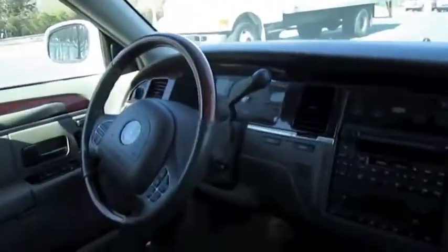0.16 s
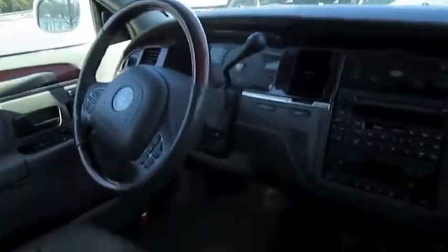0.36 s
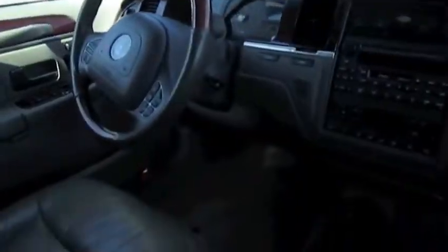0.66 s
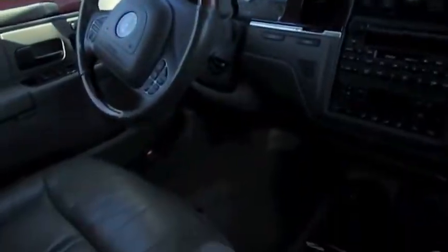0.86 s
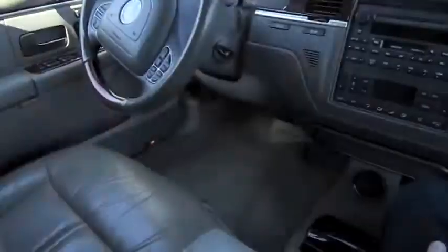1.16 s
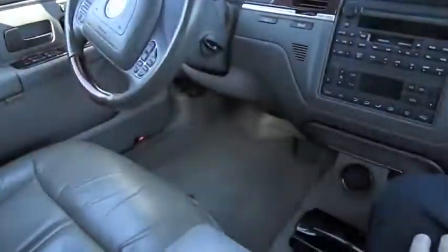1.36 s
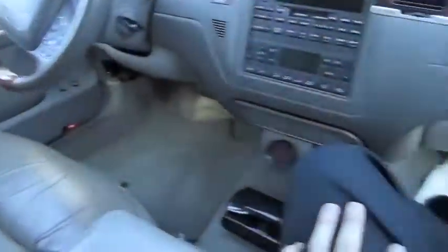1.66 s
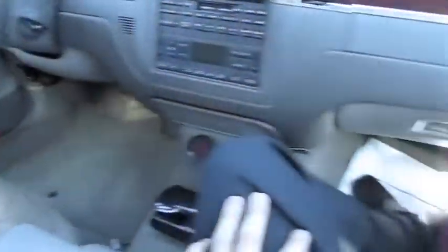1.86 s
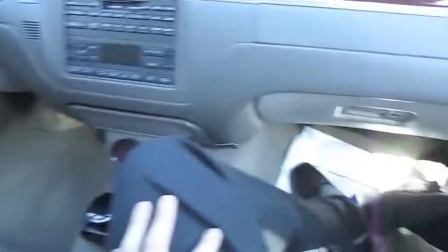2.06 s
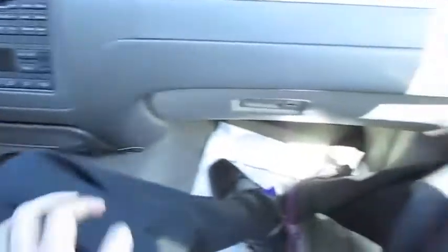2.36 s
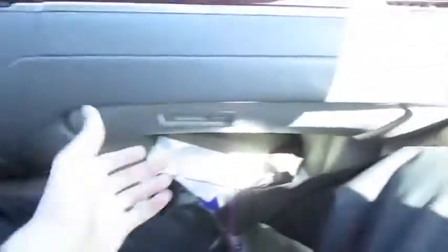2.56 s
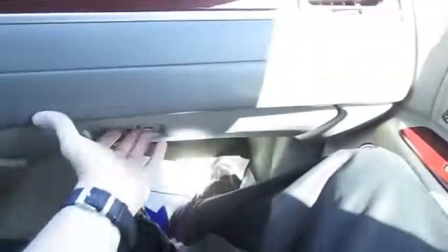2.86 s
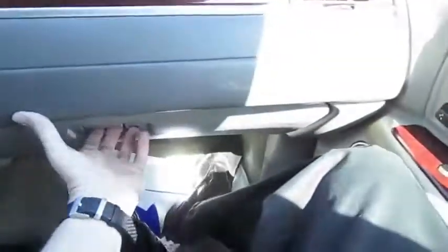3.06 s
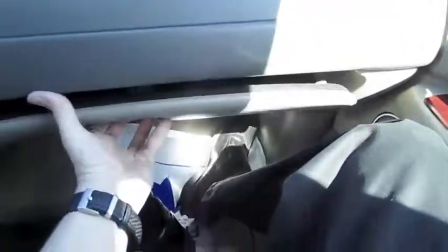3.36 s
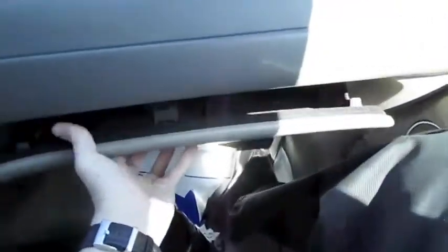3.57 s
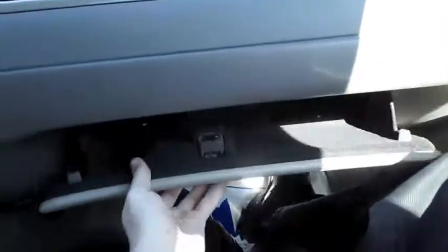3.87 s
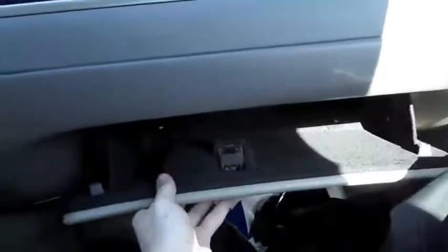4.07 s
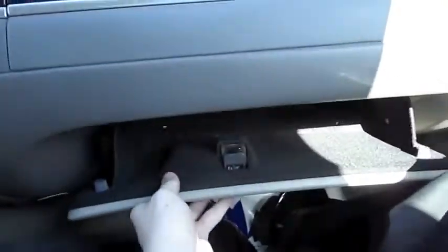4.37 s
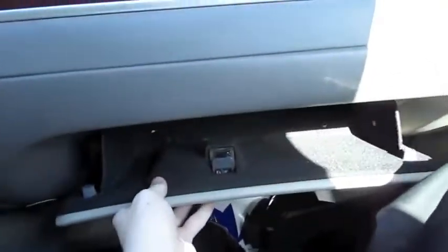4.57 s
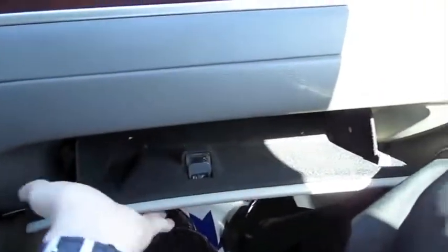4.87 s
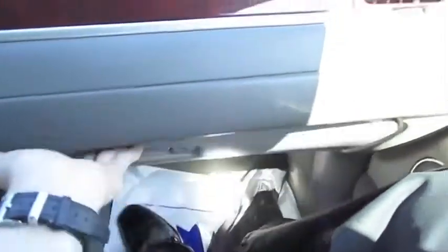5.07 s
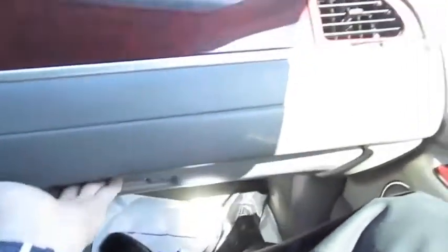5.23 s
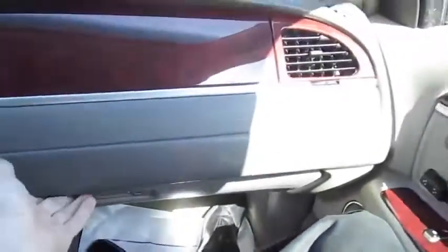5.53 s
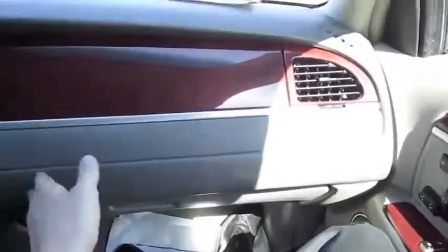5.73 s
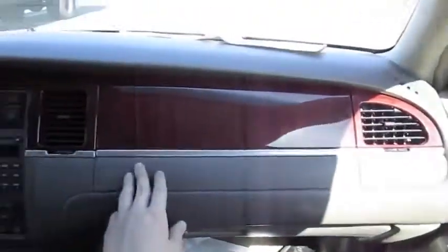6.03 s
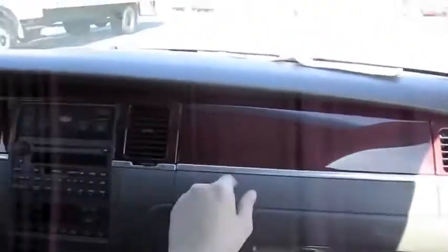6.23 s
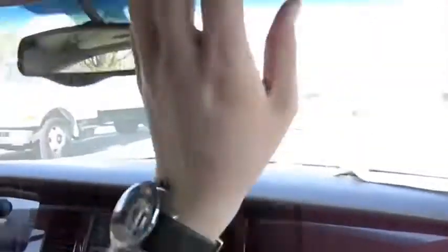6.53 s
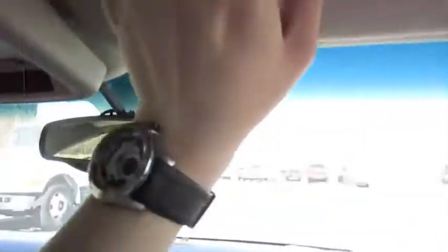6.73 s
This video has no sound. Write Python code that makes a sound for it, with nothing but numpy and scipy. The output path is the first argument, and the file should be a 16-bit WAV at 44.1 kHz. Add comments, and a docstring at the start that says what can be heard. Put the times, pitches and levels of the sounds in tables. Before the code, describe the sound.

Low engine drone in a car cabin; two clicks, sleeve rustling, scraping handle and sharp latch snap, faint ticks, then a booming glove box slam.

```python
"""An engine, most likely, idles low and steady in a parked car: wavering harmonics over coloured noise.
Two small button clicks, then cloth rustles (coloured friction noise) as a hand reaches for the glove box.
The handle scrapes (slips through resonators) and squeaks, the latch snaps, the lid opens and is slammed shut.
Blows are decaying modes plus scattered noise; trim ticks, the body booms, gain control ducks loud moments."""
import sys
import numpy as np
from scipy import signal
from scipy.fft import rfft, irfft
from scipy.io import wavfile
from scipy.ndimage import uniform_filter1d

SR = 44100
rng = np.random.default_rng(int(sys.argv[2]) if len(sys.argv) > 2 else 0)


def master_out(mix):
    """Clip the mix to full scale and print it as 16-bit PCM to the path in sys.argv[1]."""
    frames = np.transpose(np.atleast_2d(mix))
    ceiling = np.clip(frames, -1, 1)
    pcm = np.round(ceiling * 32767).astype(np.int16)
    wavfile.write(sys.argv[1], SR, pcm)


N = 304290
T = np.arange(N) / SR  # s

# idle: firing rate at the start, and its steady fall
IDLE_HZ, SAG_HZ_PER_S = 72.78, 0.385
# boom of the firing tone at the microphone: time_s, level_db
FIRING_LEVEL = [(0, -26), (.2, -25), (.78, -26.8), (1.1, -30), (1.4, -28), (2.25, -28.7), (2.52, -26),
                (3.0, -29.5), (5.0, -27.5), (5.6, -31.5), (6.2, -26), (6.6, -31.5)]
# octave of the firing tone: time_s, level_db
OCTAVE_LEVEL = [(0, -40.5), (.55, -40.5), (1.2, -46), (1.4, -51), (4.4, -48.5), (5.5, -42.5), (6.3, -49.5),
                (6.8, -45.5)]
THIRD_RE_OCTAVE_DB = -14.5
# weaker engine orders: multiple_of_firing_rate, level_re_firing_db
ENGINE_ORDERS = [(0.502, -41.5), (1.5, -31), (2.375, -35.5), (4.498, -39.5), (4.75, -37)]
# cabin noise colour: freq_hz, relative_density_db
CABIN_COLOUR = [(15, -9), (35, 7.5), (55, 1), (110, -2), (190, -11), (270, -14), (340, -17.5), (480, -20),
                (780, -19.5), (1200, -24.5), (2500, -30), (7800, -39.5), (16000, -47.5)]

# body shifts and arm moves: start_s, end_s, rustle_db, seat_db
BODY_MOVES = [(1.238, 2.46, -61.5, -52), (1.463, 2.527, -55, -81), (2.562, 3.29, -48.5, -52.5),
              (3.22, 4.15, -55.5, -62), (4.3, 4.53, -57.5, -50.5), (4.975, 5.2, -47.5, -56.5),
              (5.72, 6.0, -56, -64), (6.004, 6.4, -60, -75), (6.419, 6.85, -53, -50)]
MOVE_ATTACK_S, MOVE_RELEASE_S = 0.21, 0.19
# cloth swishes, growing until the end: start_s, end_s, level_db
CLOTH_SWISHES = [(2.188, 2.515, -52), (2.953, 3.21, -50), (3.5, 4.143, -63.5), (4.994, 5.08, -62.5),
                 (6.654, 6.852, -52)]
SWISH_RELEASE_S = 0.061
# fizz that follows the rustle; seat and fizz left while sitting still
FIZZ_RE_RUSTLE_DB, STILL_SEAT_DB, STILL_FIZZ_DB = -12.5, -59, -69.5
# seat rumble colour: freq_hz, relative_density_db
SEAT_COLOUR = [(60, -25), (110, 9), (210, 4.5), (270, 1.5), (340, 3.5), (400, -2), (490, 1.5), (700, -18.5),
               (1500, -57)]
# cloth rustle colour: freq_hz, relative_density_db
RUSTLE_COLOUR = [(250, -1), (600, 0), (900, 1.5), (2200, -4.5), (3200, -6.5), (6000, -16.5), (15000, -62)]
# fine cloth fizz colour: freq_hz, relative_density_db
FIZZ_COLOUR = [(1500, -56), (3500, -3), (5000, -1.5), (6800, -1), (10000, -5.5), (14000, -13), (16000, -29)]

# button clicks: time_s, level_db, brightness_db_per_octave
BUTTON_CLICKS = [(.5813, -21, 3.5), (.8262, -29, 9)]
# small plastic button by the microphone: freq_hz, relative_level_db, t60_s
BUTTON_MODES = [(1550, -10.5, 0.013), (2970, 1, 0.0044), (4950, -0.5, 0.0029), (8200, -13, 0.0018)]
# cabin scatter of any blow: freq_hz, relative_density_db, t60_s
CABIN_SCATTER = [(40, 5.5, 0.76), (171, 11, 0.26), (487, -7.5, 0.21), (1400, -7, 0.2), (2700, -10.5, 0.069),
                 (6080, -16, 0.1), (9400, -22.5, .08), (16000, -37.5, .07)]

# rubs on the handle, growing until the fingers let up: start_s, end_s, level_db, treble_share (0-1)
HANDLE_PULLS = [(2.937, 3.076, -36, 0.17), (3.061, 3.14, -32.5, 0.56), (3.19, 3.206, -33, 0.3)]
PULL_RELEASE_S = 0.054
# handle resonances: freq_hz, width_hz, peak_db
HANDLE_RESONANCES = [(880, 550, -2), (1300, 130, -2.5), (1500, 160, 2.5), (2070, 270, 4), (2160, 110, -8.5),
                     (2570, 280, -1.5), (3100, 130, -2.5), (3480, 36, 8), (3870, 90, -7), (5740, 170, -5.5),
                     (5500, 96, -2), (7860, 840, -16.5)]
# fingers squeak on the handle: time_s, pitch_hz, level_db
FINGER_SQUEAK = [(2.97, 697.5, -72), (3.01, 748, -50), (3.06, 801, -44), (3.085, 868, -41),
                 (3.11, 902, -70)]

# latch strains, snaps, lets go: time_s, level_db, brightness_db_per_octave, bass_db
LATCH_SNAPS = [(3.195, -45.5, 9, 0), (3.211, -35, 0.5, -0.5), (3.217, -32.5, 2, 0), (3.252, -26.5, -3, -4),
               (3.261, -28, -0.5, -5), (3.2835, -8.5, 1, -17), (3.286, -30, 2, -4), (3.3115, -23, -1.5, -9),
               (3.429, -25.5, -.5, -9)]
# latch modes: freq_hz, relative_level_db, t60_s
LATCH_MODES = [(139, -18.5, .07), (216, -15.5, 0.053), (544, -20, 0.08), (1486, 3.5, 0.012),
               (1907, -3.5, 0.032), (3340, -12, 0.011), (4100, -6.5, 0.014), (4660, -7.5, 0.019),
               (5240, -10.5, 0.02), (7670, -18, 0.018), (8510, -12.5, 0.0078), (12070, -21, .018)]
# box blows at the latch release, slam, rebounds: time_s, level_db, brightness_db_per_octave, bass_db
BOX_KNOCKS = [(3.283, -33, -4, 0), (5.1385, -14, 0, 0), (5.1513, -15, -.3, -3), (5.1565, -21, 1, -10),
              (5.198, -42, 0, -12), (5.2675, -37, -.5, -17)]
# glove box and dashboard modes: freq_hz, relative_level_db, t60_s
BOX_MODES = [(54, 1, .16), (94, 3, .08), (133, 3, .13), (156, 5, .13), (200, 6, .1), (238, 6, .09),
             (325, -4, .07), (453, -6, .13), (499, -4, .15), (566, -7, .15), (700, -3, .14), (852, -7, .08),
             (986, -6, .1), (1215, -7, .08), (1335, -11, .07), (1452, -10, .07), (1861, -10, .07),
             (2030, -13, .06), (2213, -12, .06), (2385, -14, .06), (3289, -14, .06), (4667, -15, .05),
             (5696, -14, .04)]
# light knocks of hand and lid: time_s, level_db, brightness_db_per_octave, bass_db
LID_TAPS = [(3.289, -41.5, 2, -9), (3.302, -33.5, 4.5, 7), (3.429, -27, 0.5, -1), (3.776, -45.5, 3.5, 8),
            (4.130, -29.5, -8, -18.5), (4.207, -48.5, -5, -1), (4.931, -47.5, -7, -9),
            (5.965, -41.5, 1.5, -2.5), (6.212, -33, 0, -37), (6.545, -50, -10, -18)]
# loose lid modes: freq_hz, relative_level_db, t60_s
LID_MODES = [(228, 1, 0.067), (360, -6.5, 0.096), (492, 7, 0.058), (578, -9.5, 0.3), (778, 8.5, 0.019),
             (830, 2.5, 0.042), (1020, -6, 0.038), (1390, -2.5, 0.033), (2110, -10, 0.13),
             (2760, -6.5, 0.026), (4400, -35.5, 0.027)]

# faint creaks of hinge and trim: start_s, end_s, ticks_per_s, level_db, brightness_db_per_octave
TRIM_CREAKS = [(3.55, 4.2, 11.6, -52.5, 8), (4.502, 4.6, 25.4, -49.5, 4), (5.897, 6.5, 22, -46, 0.5)]
TICK_SPREAD_DB = 2  # either way
# clearer ticks of hinge and trim: time_s, level_db, brightness_db_per_octave
TRIM_TICKS = [(3.671, -39, 4.5), (3.776, -48, 0), (3.926, -36.5, 3), (4.469, -46.5, 3.5),
              (6.078, -38.5, -2), (6.104, -35.5, -0.5), (6.130, -42, 1), (6.213, -32, -1),
              (6.369, -42.5, -1), (6.5225, -35, -0.5)]
# trim modes: freq_hz, relative_level_db, t60_s
TRIM_MODES = [(1520, -2, 0.0088), (2330, -3, 0.01), (3600, -6, 0.0097), (5800, -14, .01)]
# car body shaken by the slam: time_s, pitch_hz, level_db before rise and decay, t60_s
BODY_SHAKE = (5.15, 34, -18, 1.4)

# brief dip of the level: start_s, end_s, gain_db
LEVEL_DIP = (1.241, 1.302, -33)
BAND_EDGE_HZ = 15950


def amp(db):
    """Decibels to gain."""
    return 10 ** (np.asarray(db) / 20)


def unit(x):
    """Scales to rms 1."""
    return x / np.sqrt(np.mean(x ** 2) + 1e-20)


def curves(rows):
    """Interpolates each column of a time table at every sample."""
    s, *columns = np.transpose(rows)
    return [np.interp(T, s, c) for c in columns]


def colour(rows, hz):
    """Interpolates each column of a frequency table on a log axis."""
    f, *columns = np.transpose(rows)
    return [np.interp(np.log(hz + 1), np.log(f + 1), c) for c in columns]


def shaped(x, spectrum):
    """Filters x to a colour, at rms 1."""
    db, = colour(spectrum, np.fft.rfftfreq(N, 1 / SR))
    return unit(irfft(rfft(x) * amp(db), N))


def wander(rate_hz):
    """Low-passed noise of rms 1: a random drift."""
    hz = np.fft.rfftfreq(N, 1 / SR)
    return unit(irfft(rfft(rng.standard_normal(N)) * np.exp(-(hz / rate_hz) ** 2), N))


def swell(start_s, end_s, attack_s, release_s):
    """Movement envelope: rises from the start, holds, falls after the end."""
    rise = np.clip((T - start_s) / attack_s, 0, 1)
    fall = np.clip(1 - (T - end_s) / release_s, 0, 1)
    return rise * fall


def friction(slips_per_s, spread_db, smooth):
    """Surfaces in contact: tiny slips of uneven size over a smooth rub."""
    size = amp(spread_db * np.minimum(rng.exponential(1, N), 4))
    slipping = rng.random(N) < slips_per_s / SR
    slips = size * rng.standard_normal(N) * slipping
    return unit(slips) + smooth * rng.standard_normal(N)


def engine(waver_db=0.52, overtone_waver_db=1.96, order_waver_db=4.5):
    """Firing tone booms in the cabin with two overtones; weaker orders come and go around it."""
    firing_hz = IDLE_HZ - SAG_HZ_PER_S * T
    tone_db, = curves(FIRING_LEVEL)
    octave_db, = curves(OCTAVE_LEVEL)
    phase = 2 * np.pi * np.cumsum(firing_hz * (1 + 0.0031 * wander(9.2))) / SR
    overtones = np.sin(2 * phase) + amp(THIRD_RE_OCTAVE_DB) * np.sin(3 * phase)
    hum = amp(tone_db + waver_db * wander(32)) * np.sin(phase)
    hum += amp(octave_db + overtone_waver_db * wander(5.0)) * overtones
    for multiple, db in ENGINE_ORDERS:
        gain = amp(tone_db + db + order_waver_db * wander(4.8))
        hum += gain * np.sin(multiple * phase + 2 * np.pi * rng.random())
    return np.sqrt(2) * hum  # sine levels are rms


def cabin(level_db=-45):
    """Steady coloured noise: low rumble with a faint hiss on top."""
    return amp(level_db) * shaped(rng.standard_normal(N), CABIN_COLOUR)


def motion():
    """Gains of seat rumble, cloth rustle and fine fizz, from the moves and swishes."""
    seat, rustle, swish = np.zeros((3, N))
    for start_s, end_s, rustle_db, seat_db in BODY_MOVES:
        speed = swell(start_s, end_s, MOVE_ATTACK_S, MOVE_RELEASE_S)
        seat += amp(seat_db) * speed
        rustle += amp(rustle_db) * speed
    for start_s, end_s, db in CLOTH_SWISHES:
        swish += amp(db) * swell(start_s, end_s, end_s - start_s, SWISH_RELEASE_S)
    fizz = np.hypot(amp(FIZZ_RE_RUSTLE_DB) * rustle, swish)
    return np.hypot(seat, amp(STILL_SEAT_DB)), rustle, np.hypot(fizz, amp(STILL_FIZZ_DB))


def glancing(x, echo=0.45, delay_s=0.0016, sway=0.299):
    """The moving hand is heard directly and off the dashboard: a drifting delay shifts the colour."""
    late_s = delay_s * np.exp(sway * wander(2.9))
    return unit(x + echo * np.interp(T - late_s, T, x))


def clothes():
    """Body shifts on the seat; sleeve rustle and fizz share one uneven pressure."""
    seat_gain, rustle_gain, fizz_gain = motion()
    pressure = wander(21)
    seat = shaped(rng.standard_normal(N), SEAT_COLOUR)
    rustle = shaped(glancing(friction(1500, 2.3, 1.7)), RUSTLE_COLOUR)
    fizz = shaped(glancing(friction(3000, 7.1, 2.3)), FIZZ_COLOUR)
    return (seat_gain * amp(1.9 * wander(4.9)) * seat
            + rustle_gain * amp(1.3 * pressure) * rustle
            + fizz_gain * amp(0.63 * pressure) * fizz)


def blow(modes, scatter_db, crack_db, crack_t60_s, rise_s):
    """One blow: decaying modes, plus cabin-coloured noise with a short crack and a scattered tail."""
    t = T[:SR // 2]
    ring = np.zeros(len(t))
    for k, (hz, db, t60_s) in enumerate(modes):
        ring += (-1) ** k * amp(db - 60 * t / t60_s) * np.sin(2 * np.pi * hz * t)
    hz, age_s, z = signal.stft(rng.standard_normal(len(t)), SR, nperseg=256)
    db, t60_s = colour(CABIN_SCATTER, hz[:, None])
    tail = amp(scatter_db - 60 * age_s / t60_s)
    crack = amp(crack_db - 60 * age_s / crack_t60_s)
    noise = signal.istft(z * amp(db) * (tail + crack), SR, nperseg=256)[1][:len(t)]
    return (ring + noise) * (1 - np.exp(-t / rise_s))


def contact(x, knee_hz, tilt_db, bass_db=0):
    """Harder contact is brighter, lighter contact moves less bass below the knee."""
    hz = abs(np.fft.fftfreq(len(x), 1 / SR))
    db = tilt_db * np.log2((hz + 300) / 1500) + bass_db / (1 + (hz / knee_hz) ** 8)
    response = np.exp(np.conj(signal.hilbert(np.log(amp(db)))))  # minimum phase: causal
    return np.fft.ifft(np.fft.fft(x) * response).real


def add(mix, start_s, sound):
    """Adds a sound into the mix in place."""
    part = mix[round(start_s * SR):][:len(sound)]
    part += sound[:len(part)]


def strikes(rows, modes, scatter_db, crack_db, crack_t60_s, rise_s, knee_hz=300):
    """Plays a table of blows on one part, each with fresh scatter."""
    out = np.zeros(N)
    for start_s, db, *touch in rows:
        hit = blow(modes, scatter_db, crack_db, crack_t60_s, rise_s)
        add(out, start_s, amp(db) * contact(hit, knee_hz, *touch))
    return out


def button():
    """Small plastic part clicks: very short modes and crack."""
    return strikes(BUTTON_CLICKS, BUTTON_MODES, scatter_db=-21, crack_db=-2, crack_t60_s=0.0071,
                   rise_s=0.00027)


def handle(jerk_db=1.0, soft_hz=2600):
    """Dense slips excite the handle's resonances; each pull's bite sets its share of treble."""
    rub = friction(1800, 2.3, 0.63) * amp(jerk_db * wander(60))
    ring = np.zeros(N)
    for hz, width_hz, peak_db in HANDLE_RESONANCES:
        b, a = signal.iirpeak(hz, hz / width_hz, SR)
        ring += amp(peak_db) * signal.lfilter(b, a, rub)
    soft = signal.sosfiltfilt(signal.butter(4, soft_hz, fs=SR, output="sos"), ring)
    out = np.zeros(N)
    for start_s, end_s, db, bite in HANDLE_PULLS:
        scrape = unit(soft + np.clip(bite, 0, 1) * (ring - soft))
        out += amp(db) * swell(start_s, end_s, end_s - start_s, PULL_RELEASE_S) * scrape
    return out


def squeak(width_hz=60):
    """Uneven stick and slip of the fingers: a hoarse, noise-modulated tone that climbs."""
    hz, db = curves(FINGER_SQUEAK)
    phase = 2 * np.pi * np.cumsum(hz) / SR
    sliding = (T > FINGER_SQUEAK[0][0]) * (T < FINGER_SQUEAK[-1][0])
    tone = wander(width_hz) * np.cos(phase) + wander(width_hz) * np.sin(phase)
    return sliding * amp(db) * tone


def latch():
    """Small stiff part snaps: short modes with a strong crack."""
    return strikes(LATCH_SNAPS, LATCH_MODES, scatter_db=-6, crack_db=6.0, crack_t60_s=0.037,
                   rise_s=0.00029)


def box():
    """Glove box and dashboard are struck: low modes with strong cabin scatter."""
    return strikes(BOX_KNOCKS, BOX_MODES, scatter_db=13, crack_db=10, crack_t60_s=0.03, rise_s=0.00038)


def lid():
    """Hand and loose lid knock lightly: mid modes with a brief crack."""
    return strikes(LID_TAPS, LID_MODES, scatter_db=-2.0, crack_db=6.5, crack_t60_s=0.013,
                   rise_s=0.00097, knee_hz=610)


def creak_ticks():
    """Strain builds and slips: one tick of random size at a random moment in each interval."""
    ticks = []
    for start_s, end_s, per_s, db, bright in TRIM_CREAKS:
        chance = rng.random((40, 2))
        for s, (late, size) in zip(np.arange(start_s, end_s, 1 / per_s), chance):
            ticks.append((s + late / per_s, db + TICK_SPREAD_DB * (2 * size - 1), bright))
    return ticks


def trim():
    """Hinge and plastic trim tick and creak: short modes with a crack."""
    ticks = list(TRIM_TICKS) + creak_ticks()
    return strikes(ticks, TRIM_MODES, scatter_db=-11, crack_db=6.5, crack_t60_s=0.026, rise_s=0.00022)


def body_shake(rise_s=0.061):
    """Car body booms: a deep sine that builds after the slam and dies slowly."""
    start_s, hz, db, t60_s = BODY_SHAKE
    age_s = np.maximum(T - start_s, 0)
    envelope = amp(db - 60 * age_s / t60_s) * (1 - np.exp(-age_s / rise_s))
    return envelope * np.sin(2 * np.pi * hz * age_s)


def scene():
    """Sums everything that reaches the microphone."""
    idling = engine() + cabin()
    rubbing = clothes() + handle() + squeak()
    blows = button() + latch() + box() + lid() + trim()
    return (idling + rubbing + blows + body_shake())[None]


def record(dry, threshold_db=-23, hold_fall_db_per_s=13, attack_s=0.051, ceiling=0.81, slope=0.71):
    """Gain control that ducks fast and recovers slowly, a brief dip, soft overload, band limit."""
    power_db = 10 * np.log10(abs(uniform_filter1d(dry[0] ** 2, size=600)) + 1e-12)
    fall_db = hold_fall_db_per_s * T
    held_db = np.maximum.accumulate(power_db + fall_db) - fall_db  # peak hold with steady fall
    over_db = np.maximum(held_db - threshold_db, 0)
    keep = np.exp(-1 / (attack_s * SR))
    duck_db = slope * signal.lfilter([1 - keep], [1, -keep], over_db)
    start_s, end_s, dip_db = LEVEL_DIP
    dip = np.where((T > start_s) & (T < end_s), amp(dip_db), 1.)
    x = dry * amp(-duck_db) * uniform_filter1d(dip, size=60)
    x = x / (1 + (x / ceiling) ** 6) ** (1 / 6)
    lowpass = signal.firwin(511, BAND_EDGE_HZ, window=("kaiser", 9), fs=SR)
    return signal.oaconvolve(x, lowpass[None], "same")


dry = scene()
out = record(dry)
master_out(out)
```